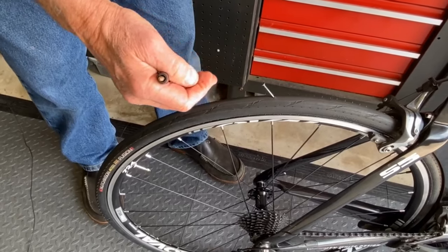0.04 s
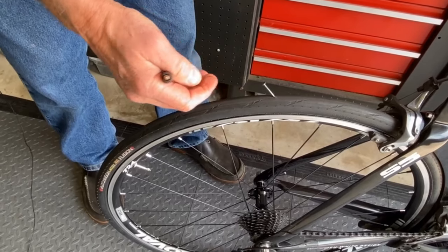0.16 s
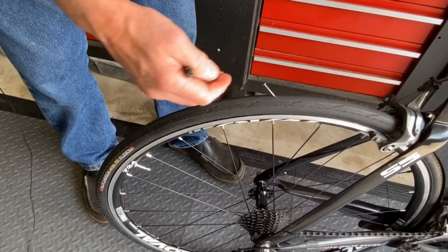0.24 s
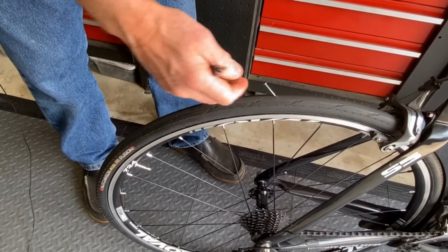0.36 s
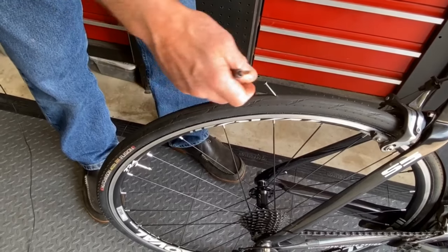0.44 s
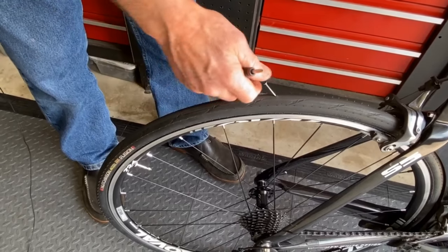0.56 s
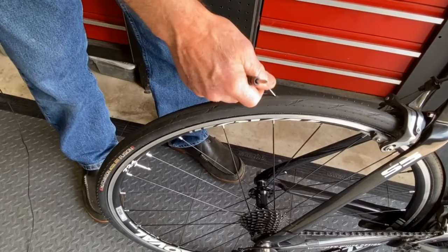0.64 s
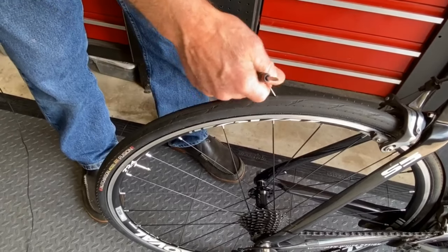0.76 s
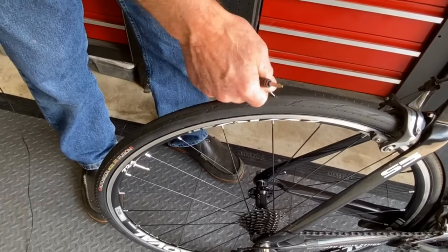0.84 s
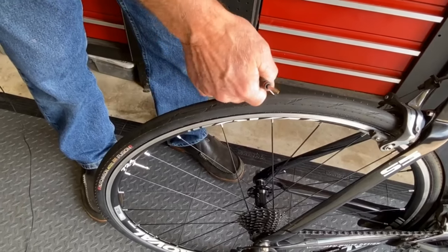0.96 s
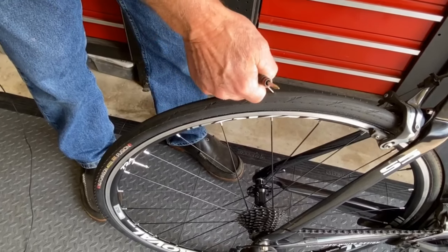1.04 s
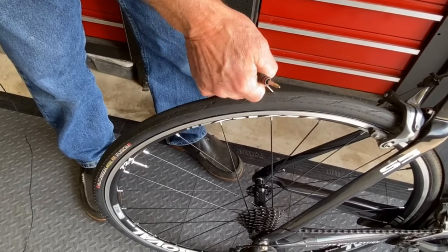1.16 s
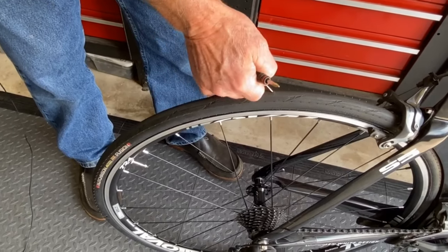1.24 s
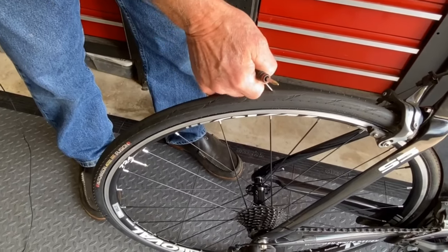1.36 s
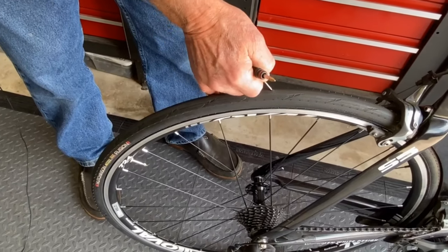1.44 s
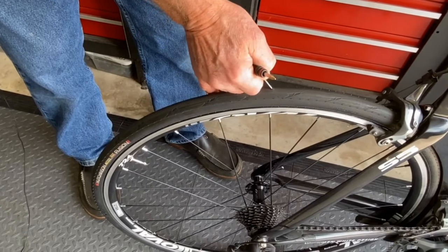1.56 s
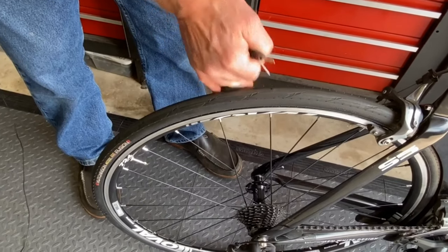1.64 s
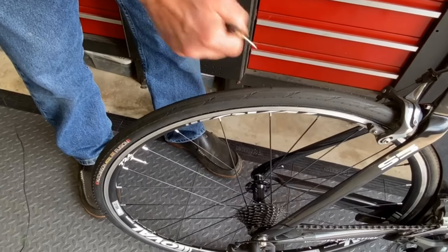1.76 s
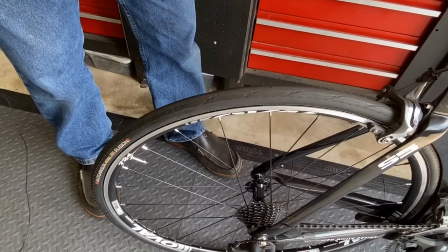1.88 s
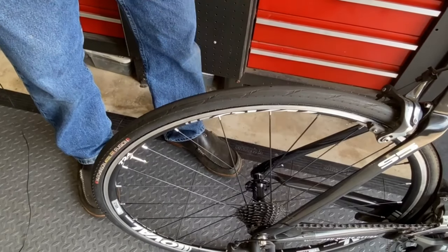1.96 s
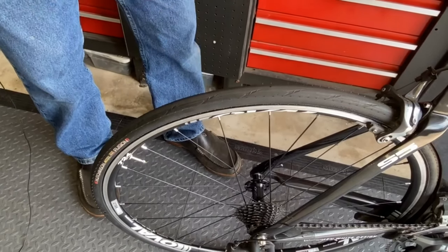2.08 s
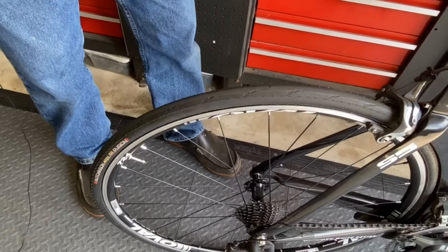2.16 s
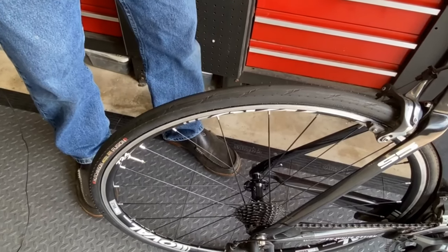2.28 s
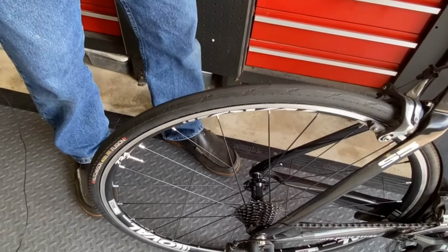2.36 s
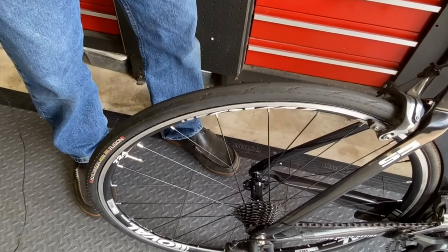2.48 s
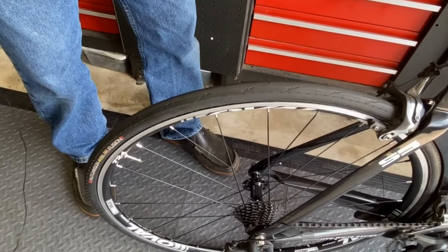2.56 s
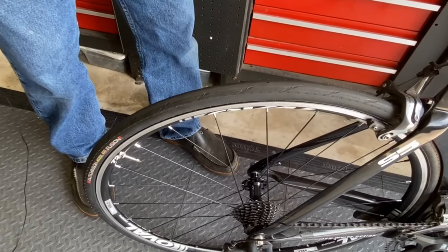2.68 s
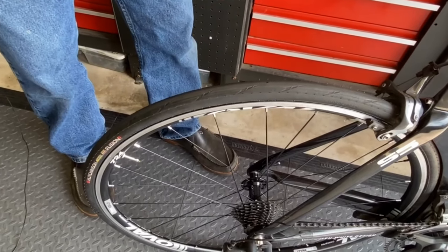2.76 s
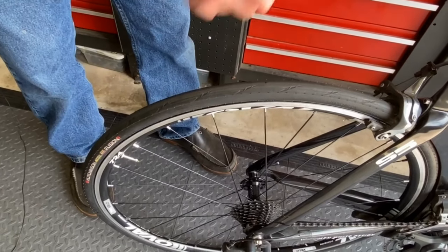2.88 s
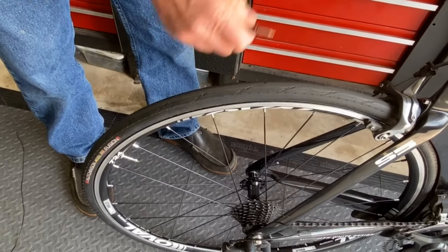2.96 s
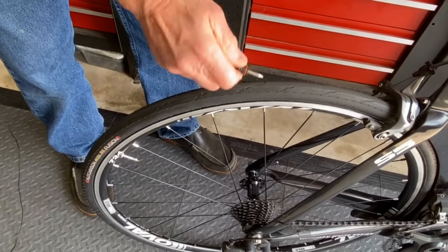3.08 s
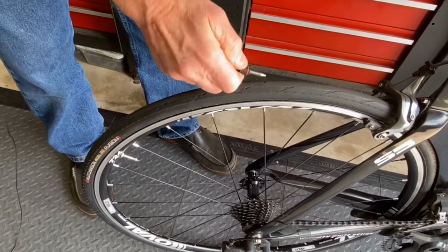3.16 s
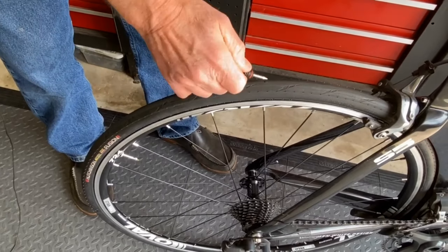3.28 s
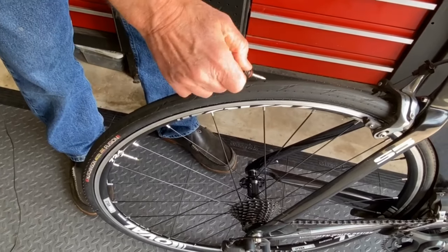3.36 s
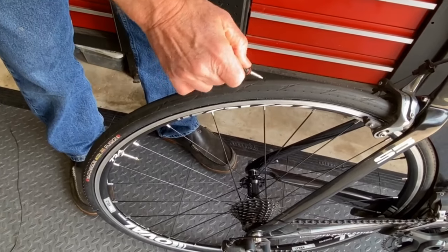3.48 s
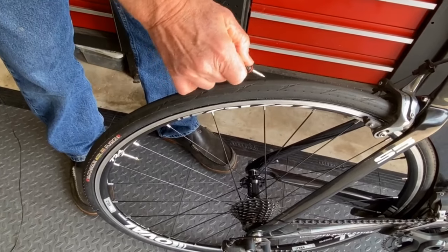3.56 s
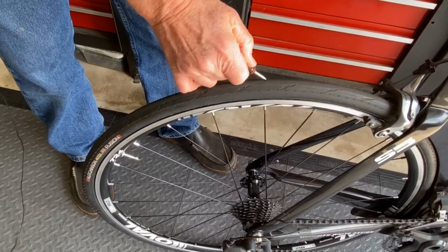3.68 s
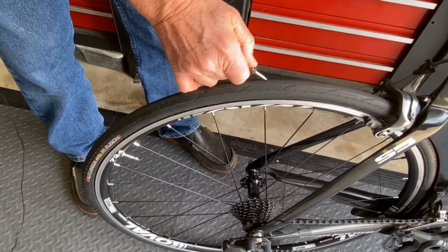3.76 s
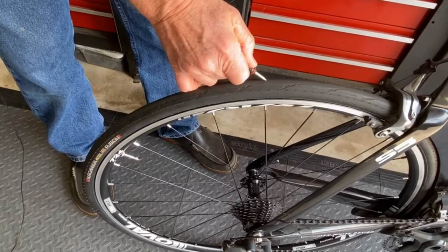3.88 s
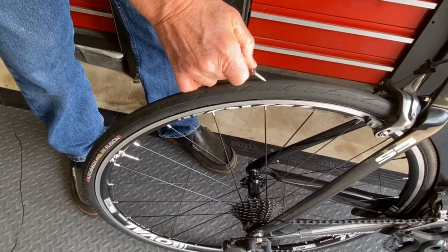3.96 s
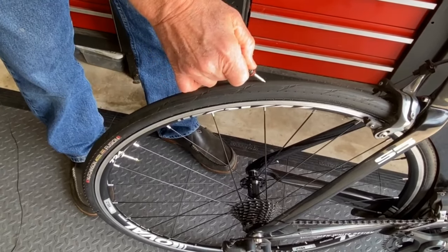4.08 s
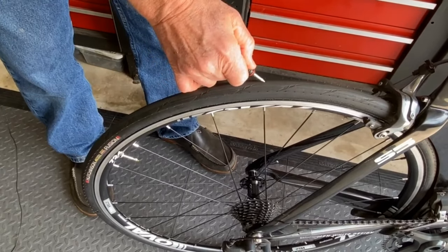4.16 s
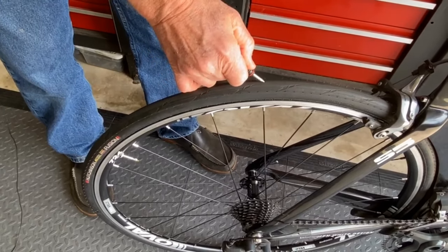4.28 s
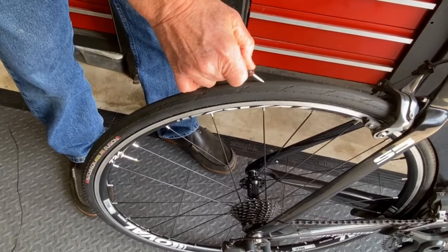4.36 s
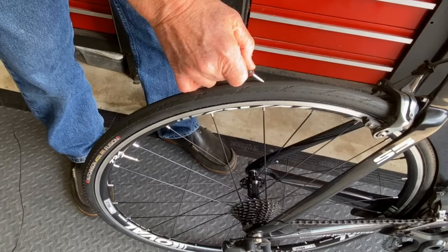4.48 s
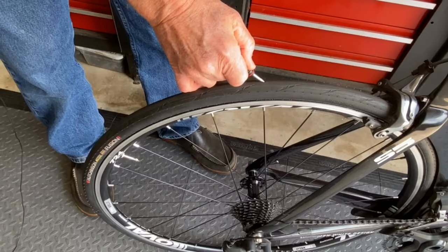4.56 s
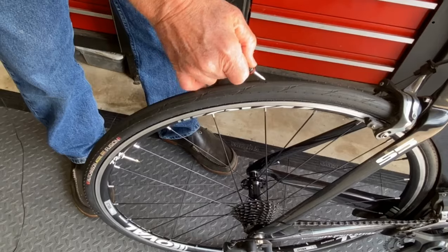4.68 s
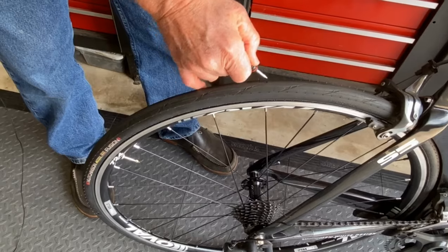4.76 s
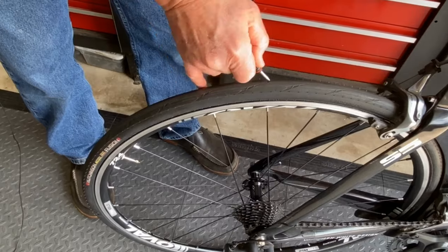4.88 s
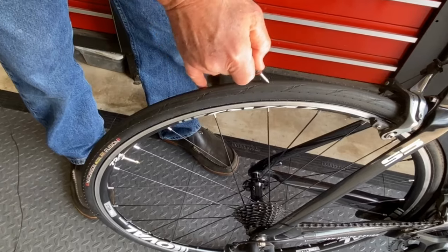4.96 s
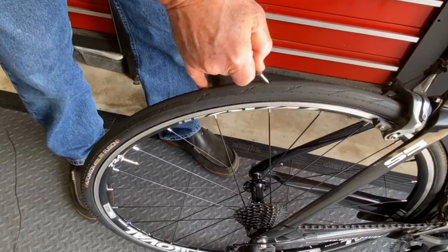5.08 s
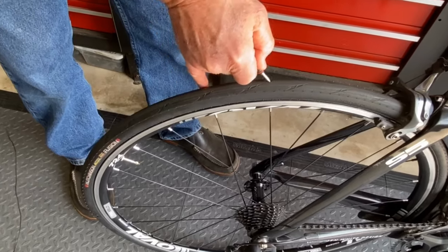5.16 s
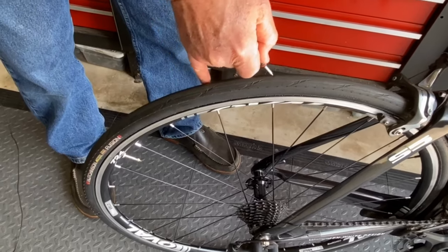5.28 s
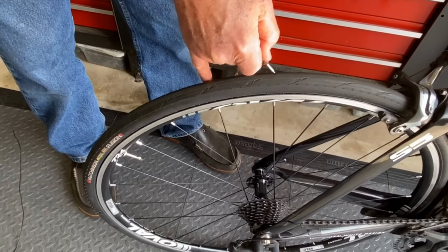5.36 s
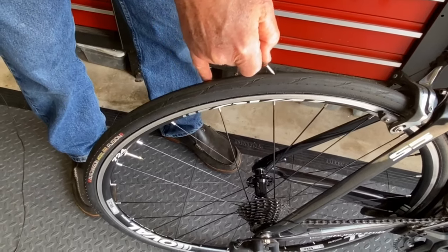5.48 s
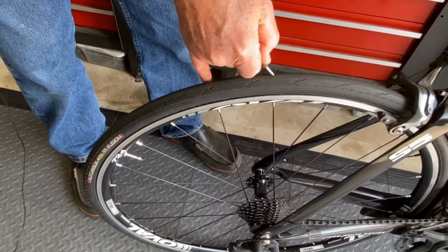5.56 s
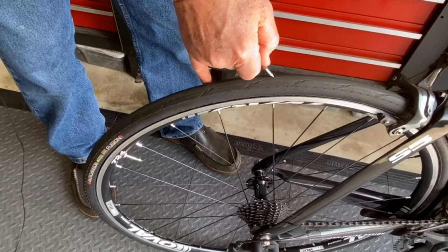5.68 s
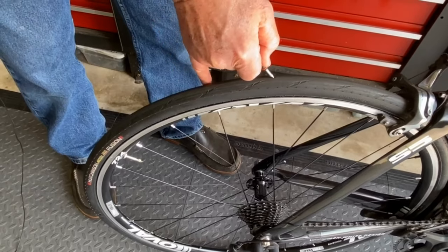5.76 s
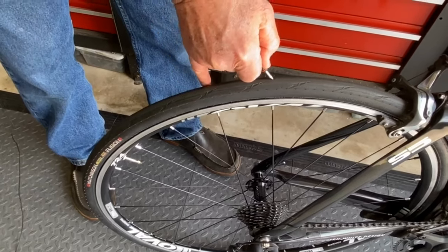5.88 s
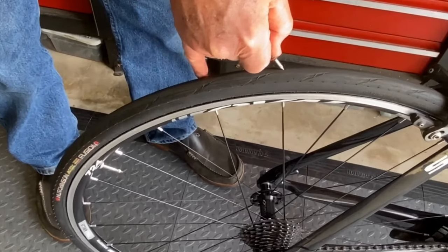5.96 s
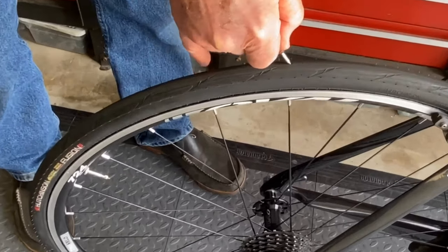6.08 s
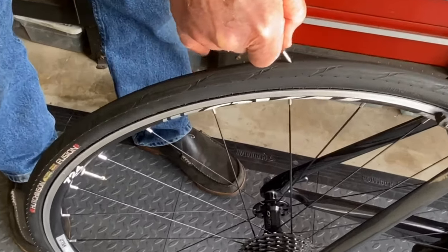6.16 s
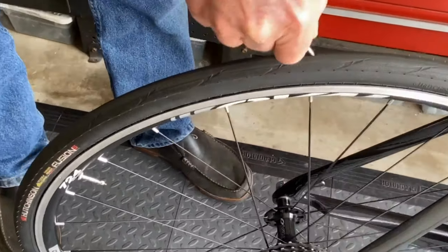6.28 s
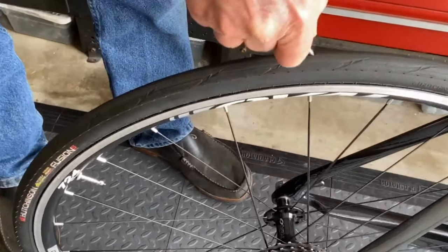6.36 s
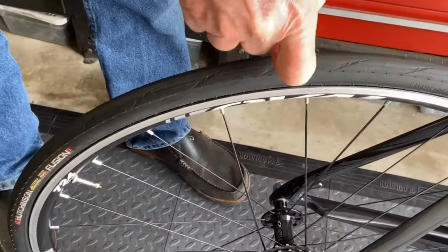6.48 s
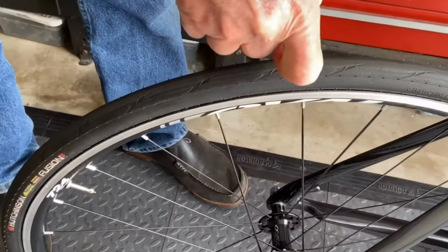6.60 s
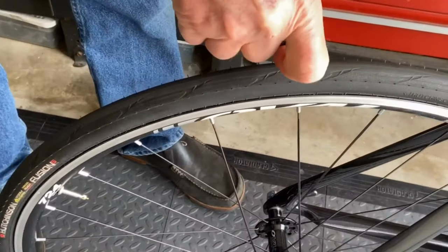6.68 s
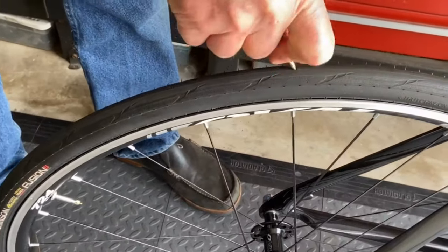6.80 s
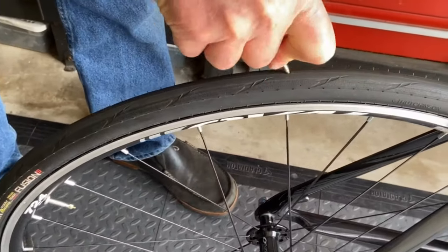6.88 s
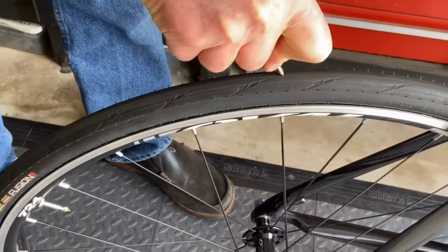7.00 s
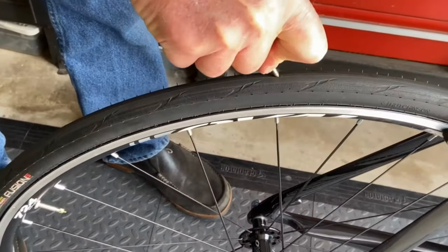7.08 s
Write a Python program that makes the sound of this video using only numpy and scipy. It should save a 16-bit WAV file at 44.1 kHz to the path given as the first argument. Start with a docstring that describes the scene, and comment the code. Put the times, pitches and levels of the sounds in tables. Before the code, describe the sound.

Close in a quiet workshop, fingers tick and rub softly on a tire over low microphone rumble. A sharp airy pop releases a strong rush that quickly drops to a steady bright hiss. The nail clatters on the floor in a few quick bounces. A hand and tool then move in the jet, making it whistle and swell irregularly, loudest just before it is suddenly plugged.

```python
"""A nail leaves a bicycle tire in a quiet workshop: a pop, then a long jet of hissing air until the hole is plugged.
The hiss is patchy noise; a hand with a tool moves in the jet and adds whistling, breaking and cupped roars.
The nail bounces on the floor as clicks, plate resonances and a thin ring; fingers tick, bump and rub.
Room tone and a decaying room answer surround it all; a hand-held microphone sways and rumbles,
far below the hiss. One microphone feeds both channels."""
import sys
import numpy as np
from scipy import signal
from scipy.fft import rfft, irfft, next_fast_len
from scipy.io import wavfile
from scipy.ndimage import uniform_filter1d, map_coordinates

SR = 44100
rng = np.random.default_rng(int(sys.argv[2]) if len(sys.argv) > 2 else 0)


def transcribe(signal):
    """Save signal, clipped to [-1, 1], as a 16-bit WAV file at the path in sys.argv[1]."""
    frames = np.atleast_2d(signal).T
    limited = np.clip(frames, -1, 1)
    pcm = np.round(limited * 32767).astype(np.int16)
    wavfile.write(sys.argv[1], SR, pcm)


N = 314433  # length in samples

# The free jet over time: time_s, level_db
JET_LEVEL = [(1.7, -33.5), (1.73, -37.5), (1.98, -38), (2.31, -42.5), (2.87, -43), (3.63, -41),
             (3.75, -40.5), (4.27, -40.5), (4.62, -43.5), (4.92, -43), (5.06, -39), (5.25, -42.5),
             (5.95, -41.5), (6.31, -36), (6.82, -35.5), (6.86, -37), (6.95, -35)]
# Hand and tool in the jet: time_s, tool_whistle_db, finger_break_db, cupped_roar_db
HAND_LEVEL = [(1.75, -48, -51.5, -51.5), (2.2, -50, -61, -51.5), (2.62, -48.5, -50, -49.5),
              (2.68, -48.5, -52, -51), (2.91, -55, -58.5, -55.5), (3.04, -50.5, -57.5, -44.5),
              (3.15, -53, -59, -40.5), (3.16, -49, -56, -47), (3.21, -40.5, -41, -39),
              (3.27, -36, -39.5, -41.5), (3.35, -36, -40, -43.5), (3.42, -41, -46, -46.5),
              (3.44, -39, -42, -42.5), (3.48, -50, -54, -47), (3.52, -51, -47, -42), (3.56, -37, -40, -42),
              (3.64, -33.5, -38.5, -43.5), (3.69, -38, -43, -45), (3.8, -35.5, -37.5, -42.5),
              (3.85, -43.5, -49.5, -49), (3.95, -43, -42.5, -46), (4.15, -43.5, -47, -48),
              (4.21, -36, -40.5, -44.5), (4.38, -34, -39.5, -43.5), (4.48, -47, -52, -48),
              (4.55, -50, -49, -49.5), (4.57, -37.5, -42, -43.5), (4.85, -46.5, -48, -45),
              (4.9, -38.5, -41, -44.5), (5.1, -43, -43, -45), (5.19, -40, -40.5, -42.5),
              (5.43, -46.5, -45, -48), (5.5, -43.5, -42.5, -45.5), (5.73, -47, -44.5, -46),
              (5.85, -41.5, -43.5, -46.5), (5.9, -43.5, -45.5, -44.5), (5.98, -35.5, -39, -42),
              (6.08, -42, -39.5, -40), (6.13, -33, -36, -40), (6.37, -46, -47.5, -43.5),
              (6.55, -49, -44.5, -44.5), (6.68, -48.5, -47.5, -42), (6.72, -35, -35, -41),
              (6.89, -28.5, -34, -37.5), (6.92, -28.5, -32.5, -38), (6.95, -26, -33.5, -39.5)]
# First rush of air, one row each for free jet, tool, fingers, cup: level_db, t60_s
FIRST_RUSH = [(-18.5, 0.15), (-19.5, 0.14), (-27, 0.29), (-26, .4)]
RUSH_RISE_S = 0.0021  # time constant of the onset
USUAL_TOOL_DB, JET_BY_TOOL = -40, 0.092  # reference level; dB of free jet per dB of tool


def stream_gains(since_pop_s):
    """Each part of the jet has its steady level plus, in power, a first rush that dies away."""
    (free_db,), (tool_db, finger_db, cup_db) = curves(JET_LEVEL), curves(HAND_LEVEL)
    free_db = free_db + JET_BY_TOOL * (tool_db - USUAL_TOOL_DB)
    onset = 1 - np.exp(-since_pop_s / RUSH_RISE_S)
    gains = []
    for level_db, (rush_db, t60) in zip([free_db, tool_db, finger_db, cup_db], FIRST_RUSH):
        rush = amp(rush_db - 60 * since_pop_s / t60) * onset
        gains.append(np.hypot(amp(level_db), rush))
    return gains, tool_db


# Relative spectrum of the jet in open air: pitch_hz, density_db (per Hz)
FREE_SPECTRUM = [(880, -49), (1500, -6), (2240, -14.5), (3070, -11), (3460, -18), (3890, -12), (4460, -7.5),
                 (5380, -11), (9150, -1), (12300, 0), (15700, -7)]
# Broad resonances of air over the tool: pitch_hz, width_hz, level_db
TOOL_MODES = [(5463, 1030, 1), (6180, 1340, 3.5), (7130, 1160, 3), (8630, 1460, -5)]
# Resonances of the jet breaking on the fingers: pitch_hz, width_hz, level_db
FINGER_MODES = [(1880, 360, -10), (2600, 470, -1.5), (3210, 495, 0), (4400, 1700, -6.5)]
# Relative spectrum of the roar in the cupped hand: pitch_hz, density_db (per Hz)
CUP_SPECTRUM = [(250, -20.5), (450, -2.5), (700, -2.5), (1500, -3), (2000, -5), (3000, -15.5)]
# Wandering pitch of the cupped hand: time_s, pitch_hz
CUP_PITCH = [(1.56, 1210), (1.68, 680), (1.8, 1040), (2.85, 1070), (2.96, 700), (3.15, 750), (3.22, 1125),
             (6.25, 1220), (6.6, 950), (6.75, 1380)]
# A dark band wandering through the jet: time_s, pitch_hz, lift_db
DARK_BAND = [(1.5, 10400, -1.5), (2.9, 10600, -6), (3.9, 11250, -6), (4.9, 11000, -5), (5.9, 10100, -5.5),
             (6.5, 9800, -4.5), (7.1, 10400, -3.5)]
# The top of the hiss brightening and dulling: time_s, lift_db
TREBLE_LIFT = [(1.5, 2.5), (2.2, 5.5), (2.9, 3.5), (3.4, 7), (4.8, 3), (5.2, 5), (6.5, 4.5), (7.1, 1)]
# Pitches that the corner of the shop lifts or cuts: pitch_hz
CORNER_HZ = [716, 866, 998, 1093, 1205, 1445, 1922, 2369, 2880, 3192, 5001, 5211, 5410, 5680, 5798, 5938,
             6207, 6390, 6713, 7090, 7386, 8080]
# Gain of each of those pitches, in the same order: gain_db
CORNER_DB = [5, 1, -3, -0.5, 2, 4.5, 3.5, 3.5, 4, 4.5, 2, 5, 8.5, 7.5, -7, 5, 7, 0.5, 3.5, -11, 3, 7]
WHISTLE_HZ, WHISTLE_DB = 6200, 7.5  # middle and greatest lift of the ridge on the tool's hiss
# The ridge blurs when the tool is deep in the jet, and fades when it is nearly out.
BLURS_OVER_DB, FADES_UNDER_DB, BLUR_PER_DB = -34.5, -45, 0.7
PLUG_S, PLUG_DB_PER_S = 6.976, 293  # the hole is shut
LEFT_DB, LEFT_DB_PER_S = -14.5, 112  # what is left seeps away


def leak():
    """Turbulence of the free jet; tool, fingers and cupped hand standing in it add their own resonances."""
    t, steady = np.arange(N) / SR, np.ones(N)
    (free, tool, fingers, cup), tool_db = stream_gains(np.maximum(t - POP_EVENT[0], 0))
    (dark_hz, dark_db), (treble_db,), (cup_hz,) = curves(DARK_BAND), curves(TREBLE_LIFT), curves(CUP_PITCH)
    flutter_db = 0.46 * wobble(18) + 0.69 * wobble(50)  # the rubber lips of the hole tremble

    # Moving humps: centre Hz, width in octaves, lift dB
    dark = (dark_hz, .04, dark_db)
    treble = (14000 * steady, .14, treble_db)
    off_db = np.maximum(tool_db - BLURS_OVER_DB, 0) + np.maximum(FADES_UNDER_DB - tool_db, 0)
    ridge_db = np.maximum(WHISTLE_DB - BLUR_PER_DB * off_db, 0)
    ridge = (WHISTLE_HZ + 50 * wobble(4), .032, ridge_db)
    cup_hump = (cup_hz, .55, 8 * steady)

    jet = free * turbulence(colour(FREE_SPECTRUM), patchy_db=1.0, moving=[dark, treble])
    jet += tool * turbulence(resonant(TOOL_MODES), patchy_db=1.6, moving=[dark, ridge])
    jet += fingers * turbulence(resonant(FINGER_MODES), patchy_db=1.0, moving=[dark])
    jet += cup * turbulence(colour(CUP_SPECTRUM), patchy_db=1.0, moving=[cup_hump])

    shut_s = np.maximum(t - PLUG_S, 0)
    plug_db = np.maximum(-PLUG_DB_PER_S * shut_s, LEFT_DB - LEFT_DB_PER_S * shut_s)
    jet *= amp(flutter_db + plug_db) * (t > POP_EVENT[0])
    return filtered(jet, corner)


def corner(f):
    """The corner of the shop lifts or cuts narrow bands, each 30 Hz wide."""
    return 1 + sum((amp(db) - 1) * 30j * f / (hz * hz - f * f + 30j * f)
                   for hz, db in zip(CORNER_HZ, CORNER_DB))


# Air seeping past the nail before the pop: time_s, level_db
SEEP_LEVEL = [(.3, -76), (.8, -76), (1.25, -77), (1.4, -72), (1.54, -74)]


def seep():
    """Air squeezing past the nail makes a faint narrow hiss around 5200 Hz."""
    level_db, = curves(SEEP_LEVEL, silent=True)
    return amp(level_db) * turbulence(resonant([(5200, 330, 0)]), patchy_db=-1.0)


# The hole opens, one event: start_s, level_db (before colour and a 4.5 dB lift), t60_s
POP_EVENT = (1.5455, -12.5, 0.078)
# Relative spectrum of the burst: pitch_hz, density_db (per Hz)
POP_SPECTRUM = [(35, -29), (60, -11), (500, 1), (1430, 4), (3370, -21), (3970, 4.5), (5770, -11.5),
                (13300, -13), (15700, -14)]


def pop():
    """The pressure step as the nail leaves: one low push and a wide burst."""
    s, db, t60 = POP_EVENT
    out, t = np.zeros(N), np.arange(SR // 20) / SR
    burst = filtered(puff(t60), colour(POP_SPECTRUM))
    push = np.sin(2 * np.pi * 330 * t) * amp(-60 * t / 0.013)
    add(out, s, amp(db) * burst / amp(-4.5))
    add(out, s, -amp(-8.5) * push)
    return out


# The nail meets the floor, levels before filtering: start_s, click_db, floor_knock_db, nail_ring_db
NAIL_DROPS = [(2.2361, -28, -21, -43), (2.2412, -13.5, -12, -34), (2.248, -21, -14, -41),
              (2.3478, -11, -14.5, -39), (2.3916, -22, -24, -58), (2.417, -24, -29, -44),
              (2.4271, -21, -24, -45), (2.4535, -24, -24.5, -56), (2.4982, -32, -26.5, -60),
              (2.5465, -21, -25.5, -59), (2.583, -20, -29, -66)]
# Resonances of the floor plate: pitch_hz, width_hz, level_db
FLOOR_MODES = [(435, 310, -2), (740, 120, -1), (967, 87, 0.5), (1430, 79, 3.5), (1650, 100, 1),
               (2190, 200, -1), (2880, 470, -5), (4250, 960, -4.5), (5520, 530, -6.5)]
# The nail's beating pair, relative to its ring level: pitch_hz, level_db, t60_s
NAIL_MODES = [(6998, -1, .75), (7090, -4, .55)]
DROP_T60_S = 0.08  # decay of the noise in click and knock


def nail():
    """Each bounce clicks, knocks the floor plate and rings the nail."""
    clicks, knocks, t = np.zeros(N), np.zeros(N), np.arange(SR) / SR
    for s, click_db, knock_db, ring_db in NAIL_DROPS:
        click = snap(0.0029) + amp(-12.5) * puff(DROP_T60_S)
        ring = sum(amp(ring_db + db - 60 * t / t60) * np.sin(2 * np.pi * hz * t)
                   for hz, db, t60 in NAIL_MODES)
        add(clicks, s, amp(click_db) * click)
        add(clicks, s, ring)
        add(knocks, s, amp(knock_db) * puff(DROP_T60_S))
    high_pass = lambda f: 1j * f / (4000 + 1j * f)
    return filtered(clicks, high_pass) + filtered(knocks, resonant(FLOOR_MODES))


# Finger and tool ticks, levels before filtering: start_s, bright_db, dull_db
FINGER_TICKS = [(0.085, -32, -44), (0.1361, -41, -48), (0.2034, -41, -38), (0.22, -41, -27),
                (0.2308, -40, -30), (0.2586, -29, -28), (0.2724, -40, -44), (0.2783, -38, -38),
                (0.417, -33, -44), (0.4848, -41, -46), (0.606, -47, -40), (0.6958, -41, -46),
                (1.055, -51, -33), (1.2979, -40, -48)]
FAINT_TICKS, FAINT_DB, FAINT_DULL_DB = 9, -41, -42  # count and levels of randomly placed ticks


def ticks():
    """Fingers on tool and tire: hard contacts ringing a bright and a duller set of resonances."""
    bright, dull = np.zeros(N), np.zeros(N)
    # Faint ticks fall before the pop, crowded towards the start.
    faint = [(POP_EVENT[0] * u * u, FAINT_DB, FAINT_DULL_DB) for u in rng.random(FAINT_TICKS)]
    for s, bright_db, dull_db in list(FINGER_TICKS) + faint:
        add(bright, s, amp(bright_db) * snap(.006))
        add(dull, s, amp(dull_db) * snap(0.0077))
    bright = filtered(bright, resonant([(10300, 2000, -0.5), (13500, 4000, -10)]))
    dull = filtered(dull, resonant([(1000, 1100, -3), (2400, 600, 3), (5500, 2900, -3.5)]))
    return bright + dull


# Soft bumps, level before the rise: start_s, level_db, pitch_hz, rise_s
SOFT_BUMPS = [(0.35, -22, 90, 0.0037), (1.055, -28, 123, 0.00022), (2.694, -28, 149, 0.0026),
              (6.648, -41, 205, 0.0024), (6.963, -28.5, 138, 0.0017), (7.03, -26, 120, 0.0037)]


def bumps():
    """Each soft bump is a low, softly rising cosine that dies by 60 dB in 36 ms."""
    out, t = np.zeros(N), np.arange(SR // 10) / SR
    for s, db, hz, rise in SOFT_BUMPS:
        decay = amp(db - 60 * t / 0.036)
        add(out, s, decay * np.cos(2 * np.pi * hz * t) * (1 - np.exp(-t / rise)))
    return out


# Skin and cloth rubbing: start_s, length_s, level_db
RUB_STROKES = [(0.0, 0.13, -59), (0.206, .06, -59.5), (0.39, 0.079, -63.5), (0.595, .04, -54),
               (0.844, .03, -73), (1.047, 0.0065, -74), (1.292, 0.35, -68.5)]
# Relative spectrum of the rubbing: pitch_hz, density_db (per Hz)
CLOTH_SPECTRUM = [(470, 3), (800, 6), (1040, 3), (1710, 2.5), (1840, -1), (2750, -3.5), (15700, -17.5)]
RUB_RISE_DB_PER_S, RUB_FALL_DB_PER_S, RUB_REST_DB = 300, 150, -87


def rubbing():
    """Skin and cloth rustle as uneven noise swelling in strokes, over a rest level until the pop."""
    t = np.arange(N) / SR
    strokes = amp(RUB_REST_DB) * (t < POP_EVENT[0])
    for s, length, db in RUB_STROKES:
        rise_db = RUB_RISE_DB_PER_S * np.maximum(s - t, 0)
        fall_db = RUB_FALL_DB_PER_S * np.maximum(t - s - length, 0)
        strokes = strokes + amp(db - rise_db - fall_db)
    rustle = turbulence(colour(CLOTH_SPECTRUM), patchy_db=2.5) * amp(1.9 * wobble(90))
    return strokes * rustle


# Handling of the microphone: time_s, sway_db, rumble_db
SHAKE_LEVEL = [(0.0, -12, -40), (0.22, -35, -32), (0.28, -13.5, -34), (0.44, -13, -30), (0.48, -12, -32),
               (0.61, -27.5, -36.5), (0.87, -17, -41), (1.15, -35.5, -43), (2.18, -15.5, -32.5),
               (2.4, -29.5, -46.5), (2.48, -13.5, -37), (3.02, -32.5, -42.5), (5.74, -38, -42),
               (6.03, -24, -42), (6.11, -35, -41), (6.37, -28, -40.5), (6.51, -16.5, -41),
               (6.59, -35, -38.5), (6.91, -20, -36), (7.13, -31.5, -39)]
# Relative spectrum of the sway, before its limit: pitch_hz, density_db (per Hz)
SWAY_SPECTRUM = [(1, -8.5), (3, 8.5), (8, -1.5), (20, -11.5), (30, -54), (100, -160)]
# Relative spectrum of the rumble: pitch_hz, density_db (per Hz)
RUMBLE_SPECTRUM = [(12, -54), (20, -6.5), (29, -9), (54, -20.5), (300, -47.5), (390, -82), (660, -120)]
FADE_IN_S = .03  # the sway fades in over the first 30 ms


def handling():
    """The hand that holds the microphone sways, never far, and rumbles."""
    sway_db, rumble_db = curves(SHAKE_LEVEL)
    drift = unit(filtered(rng.standard_normal(N), colour(SWAY_SPECTRUM)))
    sway = unit(np.tanh(drift)) * unit(amp(3.2 * wobble(12)))
    sway *= np.minimum(np.arange(N) / SR / FADE_IN_S, 1)
    rumble = unit(amp(3.6 * wobble(14)) * turbulence(colour(RUMBLE_SPECTRUM), patchy_db=-0.9))
    return amp(sway_db) * sway + amp(rumble_db) * rumble


# Decay of the workshop's answer: pitch_hz, t60_s
WORKSHOP_DECAY = [(200, 1), (1200, 0.59), (4000, 0.29), (12000, 0.14)]


def workshop(x):
    """Each frequency of the room's answer dies at its own speed."""
    hz, t, z = signal.stft(rng.standard_normal(SR // 2), SR, nperseg=256)
    decay = amp(-60 * t / along(WORKSHOP_DECAY, hz)[:, None])
    tail = signal.istft(z * decay, SR, nperseg=256)[1]
    late = np.pad(x, (200, 0))  # the answer comes 200 samples later
    return signal.fftconvolve(late, tail / np.linalg.norm(tail))[:N]


# Relative spectrum of the workshop tone: pitch_hz, density_db (per Hz)
ROOM_SPECTRUM = [(59, -15), (100, -8.5), (219, -6), (270, -6.5), (479, -9.5), (591, -12.5), (3150, -32),
                 (4800, -31.5), (5230, -35), (5930, -33.5), (15700, -35)]
ROOM_TONE_DB = -57.5  # rms


def room_tone():
    """The quiet workshop's background is steady coloured noise."""
    return amp(ROOM_TONE_DB) * turbulence(colour(ROOM_SPECTRUM), patchy_db=0.4)


def turbulence(response, patchy_db, moving=()):
    """Noise of rms 1 with patches of random gain; moving humps are (centre Hz, octaves, dB) curves."""
    hz, t, z = signal.stft(rng.standard_normal(N), SR, nperseg=512)
    field = uniform_filter1d(rng.standard_normal(z.shape), size=6, axis=0)
    field = uniform_filter1d(field, size=10, axis=1)
    z = z * amp(patchy_db * unit(field))
    frames = np.minimum(t * SR, N - 1).astype(int)
    for centre_hz, width, lift_db in moving:
        z = z * hump(hz[:, None], centre_hz[frames], width, lift_db[frames])
    noise = signal.istft(z, SR, nperseg=512)[1][:N]
    return unit(filtered(noise, response))


def hump(hz, centre_hz, width, lift_db):
    """A rounded rise (or dip) of gain around a centre, width in octaves."""
    octaves = np.log2((hz + 1) / centre_hz)
    return amp(lift_db * np.exp(-(octaves / width) ** 2 / 2))


def puff(t60):
    """A burst of noise that dies away, cut after a quarter second."""
    t = np.arange(SR // 4) / SR
    return rng.standard_normal(len(t)) * amp(-60 * t / max(t60, .001))


def snap(t60):
    """A hard contact: one sharp swing, then a short crackle."""
    sound = 0.44 * puff(t60)
    sound[:3] = [1, -1, .3]
    return sound


def wobble(rate):
    """A smooth random curve, rate knots a second."""
    knots = rng.standard_normal(int(N * rate / SR) + 4)
    return map_coordinates(knots, [np.arange(N) * rate / SR])


def resonant(modes):
    """The causal response of a set of resonances, alternating in sign."""
    return lambda f: sum((-1) ** k * amp(db) * 1j * f * w / (c * c - f * f + 1j * f * w)
                         for k, (c, w, db) in enumerate(modes))


def colour(points):
    """The gain of a spectrum table."""
    return lambda hz: amp(along(points, hz))


def along(points, hz):
    """Interpolates (Hz, value) points on a log frequency axis."""
    f, v = np.transpose(points)
    return np.interp(np.log(hz + 1), np.log(f + 1), v)


def filtered(x, response):
    """x times a response of frequency."""
    m = next_fast_len(len(x) + SR // 2)
    return irfft(rfft(x, m) * response(np.fft.rfftfreq(m, 1 / SR)), m)[:len(x)]


def curves(rows, silent=False):
    """One value per sample for each column after the time; -150 dB outside the table if silent."""
    s, *cols = np.transpose(rows)
    edge = -150 if silent else None
    return [np.interp(np.arange(N) / SR, s, c, edge, edge) for c in cols]


def add(track, s, sound):
    """Mixes a sound in at time s."""
    track[round(s * SR):][:len(sound)] += sound


def amp(db):
    """Decibels to gain."""
    return 10 ** (np.asarray(db) / 20)


def unit(x):
    """Scaled to rms 1."""
    return x / np.sqrt(np.mean(x ** 2) + 1e-20)


def scene():
    """Direct sound, the workshop's answer, handling and room tone; one microphone feeds both channels."""
    hits = pop() + nail() + ticks() + bumps() + rubbing()
    air = leak() + seep()
    answer = workshop(amp(-17.5) * hits + amp(-12.5) * air)
    mono = hits + air + answer + handling() + room_tone()
    return np.array([mono, mono])


TOP_HZ = 15780  # middle of the 120 Hz wide slope at the band limit


def record(dry):
    """Nothing is kept above the band limit."""
    edge = lambda hz: np.clip((TOP_HZ - hz) / 120 + .5, 0, 1) ** 2
    return np.array([filtered(side, edge) for side in dry])


dry = scene()
out = record(dry)
transcribe(out)
```